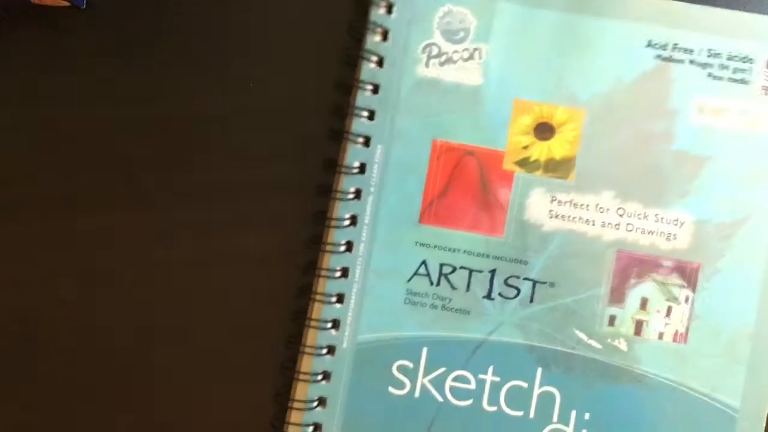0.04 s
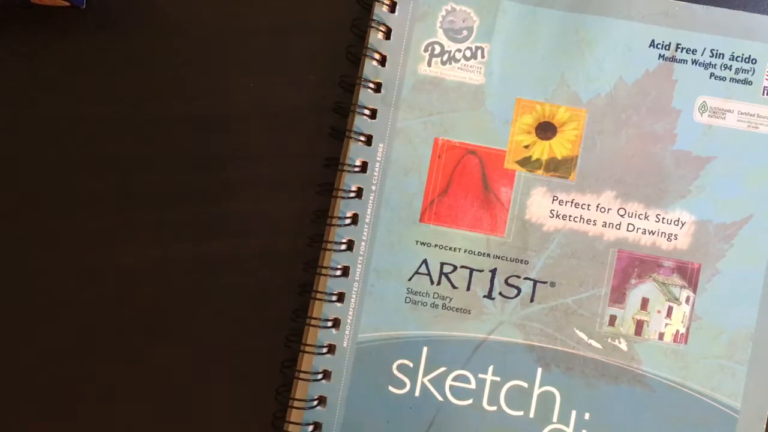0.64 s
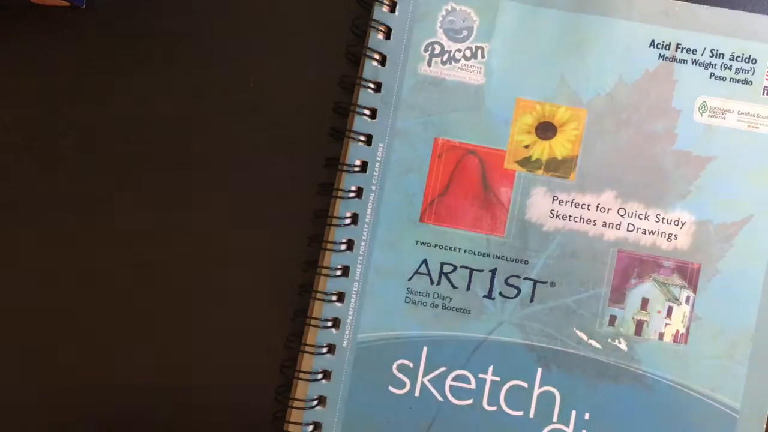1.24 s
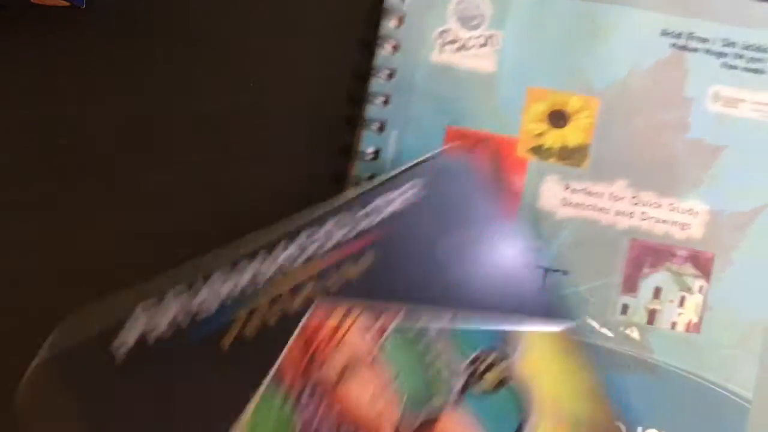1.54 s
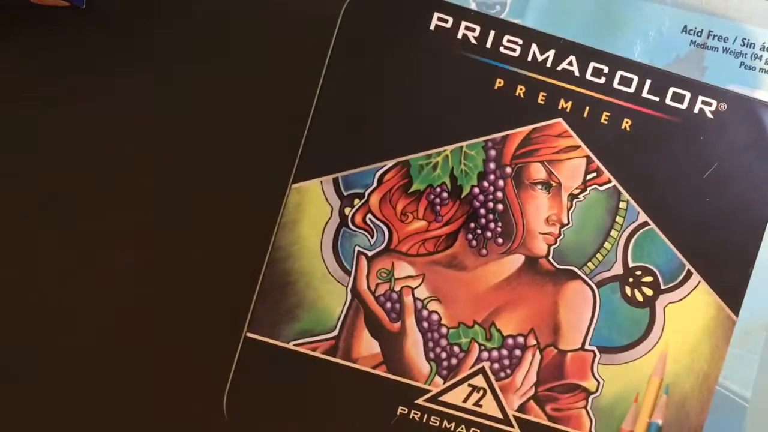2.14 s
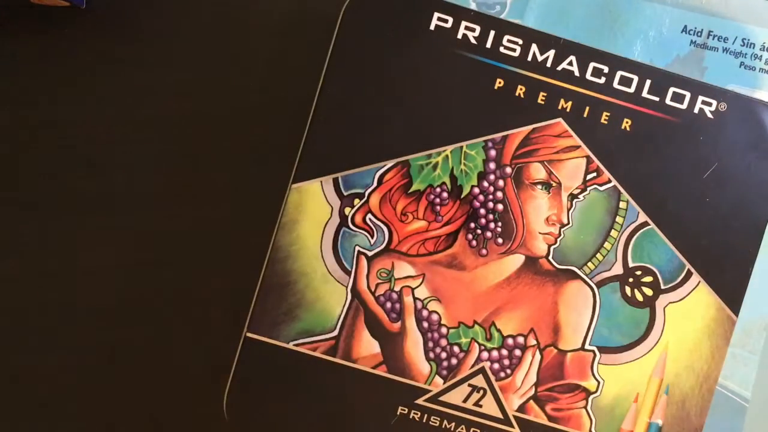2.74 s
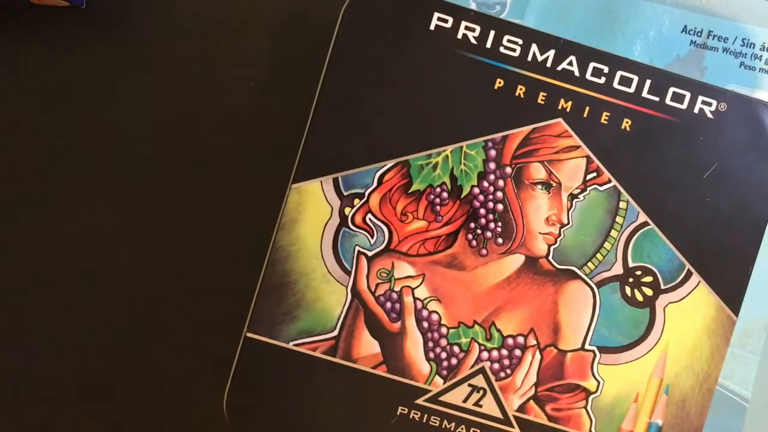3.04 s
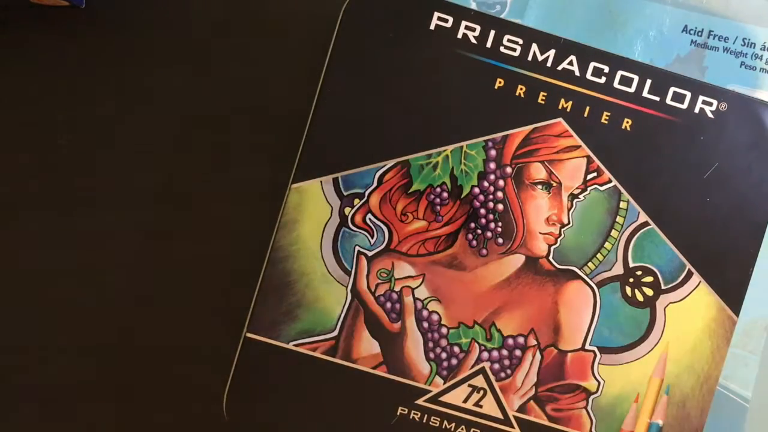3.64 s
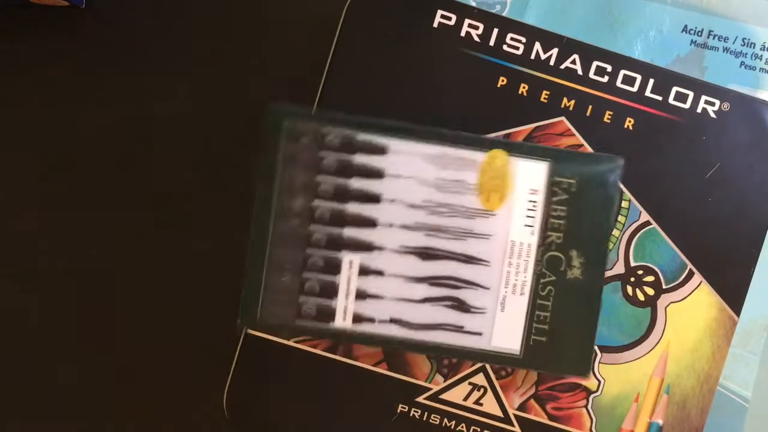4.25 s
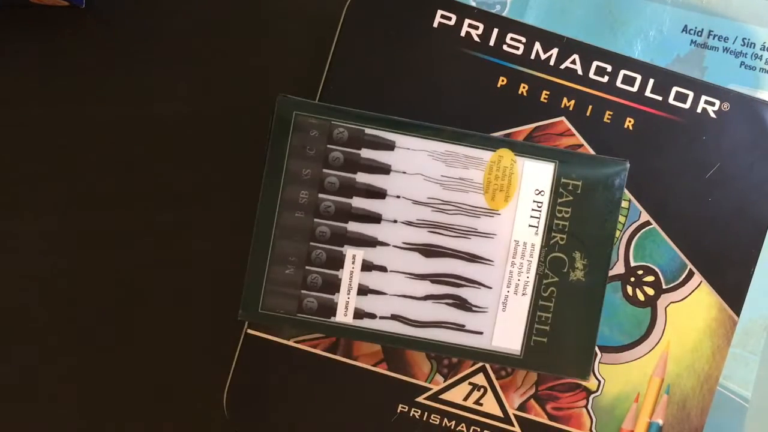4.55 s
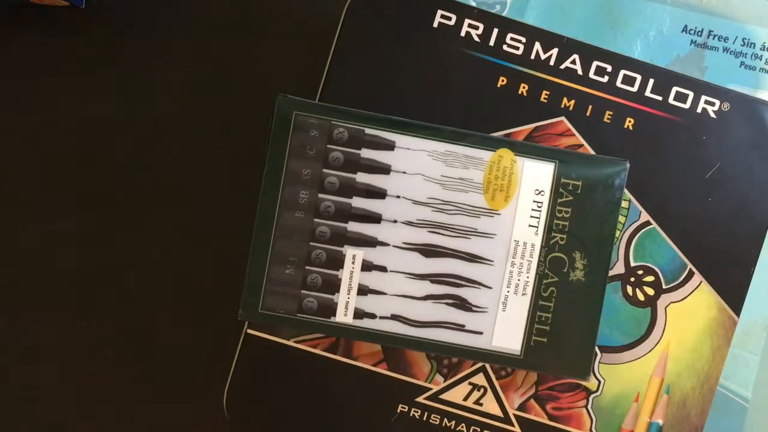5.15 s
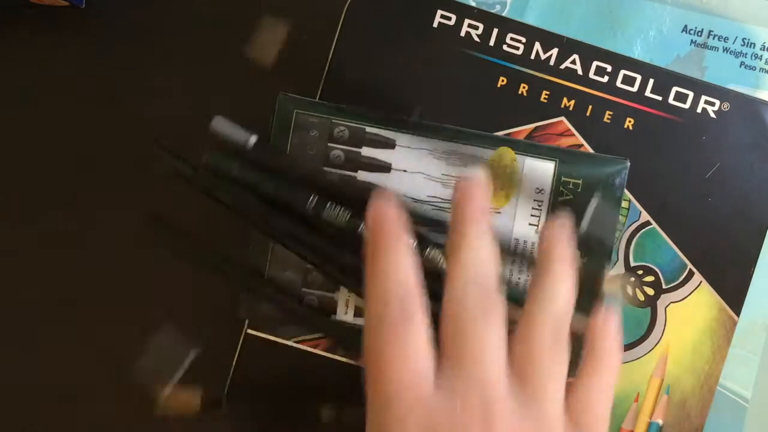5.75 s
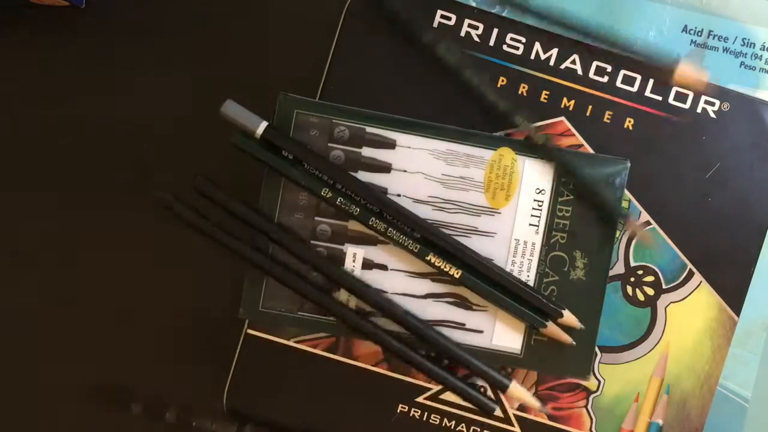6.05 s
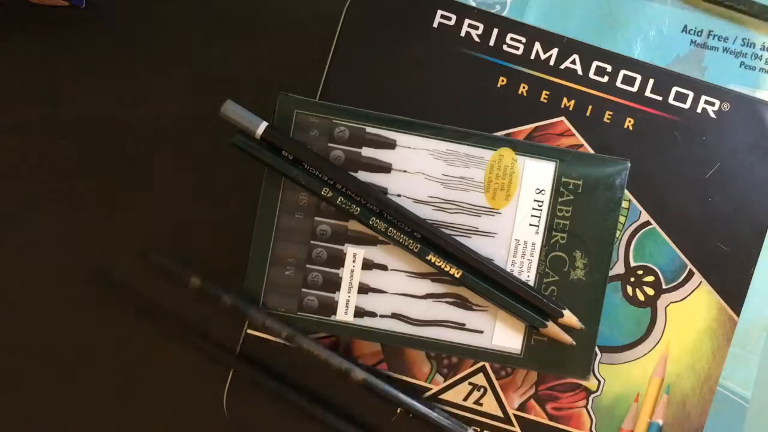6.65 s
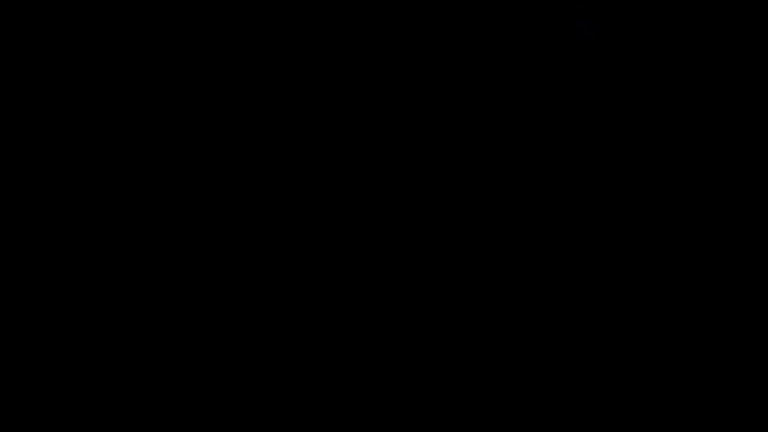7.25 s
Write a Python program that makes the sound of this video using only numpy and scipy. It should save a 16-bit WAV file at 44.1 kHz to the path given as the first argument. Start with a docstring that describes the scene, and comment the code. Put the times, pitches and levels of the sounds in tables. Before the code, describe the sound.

A tin and a plastic pen pack knock down on a table, then loose wooden pencils spill and clatter over the pile.

```python
"""Art supplies piled on a table

Close to a phone in a small quiet room, fingers shift the phone and brush packaging. A flat tin of pencils lands
on a sketchbook in three knocks and a plastic pack of pens drops on it. Loose pencils click in a hand, spill on
the pile in two bursts, bounce and roll off. Each blow is a noise crack (dense modes) plus a short ring
(distinct modes); the walls add a brief tail."""
import sys
import numpy as np
from scipy import signal
from scipy.fft import rfft, irfft, next_fast_len
from scipy.io import wavfile

SR = 44100
rng = np.random.default_rng(int(sys.argv[2]) if len(sys.argv) > 2 else 0)


def master(y):
    """Save y as 16-bit WAV."""
    cut = np.clip(np.atleast_2d(y).T, -1, 1)
    pcm = np.round(cut * 32767)  # scale
    wavfile.write(sys.argv[1], SR, pcm.astype(np.int16))


N = 325581
BLOW_SAMPLES = 12288
AGE_S = np.arange(BLOW_SAMPLES) / SR

# Noise spectra of room, fingers and struck things: f/Hz, relative density/dB
AIR_SPECTRUM = [(12, -37), (20, -5.5), (120, -5), (177, -17.5), (262, -17.5), (319, -27), (347, -26.5),
                (560, -31.5), (698, -39), (897, -33.5), (3950, -43.5), (4940, -46), (6010, -45.5),
                (16000, -54.5)]
BRUSH_SPECTRUM = [(100, -6.5), (400, -10), (700, -9.5), (1200, -3), (2200, -7.5), (4000, -11), (8000, -18),
                  (15000, -25)]
CLICK_SPECTRUM = [(200, -29), (700, -29), (1300, -8), (2800, -1.5), (6000, 8), (9000, 4), (14000, -10)]
PACK_SPECTRUM = [(50, -27.5), (110, -12), (220, -4.5), (400, -0.5), (600, -14.5), (1200, 1.5), (2000, -6.5),
                 (2800, -6.5), (4000, -9.5), (6000, -14.5), (9000, -11.5), (14000, -25)]
TIN_SPECTRUM = [(40, -19), (70, 3), (105, -7), (170, 0), (400, 2.5), (750, -3.5), (1200, -3), (2000, -7),
                (3500, -11), (6000, -16), (9000, -17), (14000, -21)]
PENCIL_SPECTRUM = [(50, -49), (130, -8.5), (260, -1.5), (450, 0), (750, -4.5), (1200, -3), (2200, -0.5),
                   (3500, -7), (6000, -8), (9000, -15), (14000, -24.5)]
# Mains hum: f/Hz, rms level/dB
HUM_PARTIALS = [(59.2, -61), (118.4, -59)]
# Phone port notches: f/Hz, width/Hz, gain/dB
PORT_NOTCHES = [(4970, 170, -2.5), (7475, 700, -2), (10170, 690, -5)]
# Resonances: f/Hz, relative level/dB, t60/s
HELD_STICK_MODES = [(2300, -9, .025), (2950, -8, .03), (3390, -6, .03), (4340, -7, .03), (5540, 2, .045),
                    (6500, -3, .035), (7000, -1, .035), (8150, -5, .04), (9220, -2, .035),
                    (12420, -10, .035)]
FREE_STICK_MODES = [(2140, 8, 0.03), (2560, -8, 0.07), (2920, 2.5, 0.032), (3550, 8, 0.04), (4080, 1, 0.05),
                    (5280, 6, 0.048), (5650, -12, .08), (5915, -8, 0.06), (6550, -6, 0.05),
                    (6210, -3, 0.031), (8190, 0.5, 0.045), (9000, -6, 0.055), (9500, -4, 0.035),
                    (11300, -8, 0.045), (12450, -7, .04), (14600, -14, .04)]
PILE_MODES = [(123, -16, 0.12), (170, -5, .12), (241.6, -0.5, .11), (350, -7, 0.07), (446, -0.5, 0.075),
              (664, -14, 0.11), (805, -7, 0.11), (1045, -2.5, 0.1), (1141, -2, 0.13), (1270, -2, .07),
              (1420, -5, .07), (1730, -1.5, 0.1), (1790, -6, .09), (2253, -11.5, 0.1)]
LID_MODES = [(61.8, -17, .14), (155, -13, .1), (185, -14.5, 0.073), (319, -3, 0.12), (421, 3, .09),
             (525, -13, .08), (655, -8.5, 0.086), (820, -7, .09), (930, -4.5, .085), (1052, -6.5, .09),
             (1220, -14, .09), (1315, -3.5, .1), (1765, -14, .12)]
# Finger strokes, first on the phone itself, then on packaging: t/s, level/dB, length/s, thud/dB, tilt/(dB/oct)
BRUSH_STROKES = [(.002, -42, .024, 4, 2.5), (.016, -62, .15, 4, 4), (.5, -63, .14, 12, -1),
                 (.684, -57, .037, 21, 2), (.616, -63, .3, 4, 5), (.856, -46, .059, 3, -4),
                 (.947, -56, .021, 14, -1), (1.504, -52.5, .097, 10, -5), (3.03, -59, .03, -6, -8),
                 (3.119, -53.5, .05, -12, -5), (3.553, -60.5, .08, -8, -2), (3.642, -51.5, .083, -15, -4),
                 (3.94, -49, .033, -9, -4), (3.997, -47, .045, -6, -1)]
# Clicks in the hand: t/s, level/dB, tilt/(dB/oct), f/Hz
HAND_CLICKS = [(.273, -44, -9, 2370), (.372, -31.5, -6, 2570), (.403, -46, -9, 2490),
               (2.627, -51, -17, 2800), (4.46, -51, -14, 3060), (4.635, -53, -7, 3470),
               (4.693, -52, -5, 3500), (4.741, -45, -7, 2850), (4.747, -36, 1, 5390), (4.77, -36, 3, 3340),
               (4.802, -24, 1, 5500), (4.831, -32, 0, 5650), (4.864, -36, -11, 3400),
               (4.889, -40, -6, 5600), (4.897, -40, -9, 3350), (4.949, -38.5, -3, 3010),
               (5.022, -51, -10, 3300), (5.465, -46, -13, 3550), (5.611, -44, -13, 2900),
               (5.664, -46, -13, 2960)]
# Pen pack landing: t/s, level/dB, thud/dB, tilt/(dB/oct)
PACK_BLOWS = [(4.141, -27, 6, 0), (4.147, -17.5, -1, -1), (4.158, -19.5, 3.5, 1), (4.163, -14.5, 2, -1),
              (4.169, -25, 7, -2), (4.269, -40, -11, -4), (4.306, -44, -10, -7)]
# Tin landing and rocking to rest: t/s, level/dB, thud/dB, tilt/(dB/oct), lid ring/dB, rim lead/s
TIN_KNOCKS = [(1.594, -14.5, 0, 2.5, -10, .011), (1.69, -14, 1, -4, 0, .021),
              (1.817, -20, -2, 1.5, 0, .017), (1.846, -29, -4, -2, -9, .005),
              (1.886, -28.5, -3, 0, -6, .007), (1.937, -39, -4, 2, 3, .004), (1.977, -43, -2, -4, -5, .003),
              (2.034, -56, 5, 4, -8, .001)]
# Pencils hitting the pile: t/s, level/dB, thud/dB, tilt/(dB/oct), stick ring/dB, clack f/Hz
PENCIL_BLOWS = [(5.719, -19, 4, 3, -2, 1730), (5.75, -12, -20, -4, -1, 1220),
                (5.758, -21.5, -16, 10, -5, 2000), (5.766, -19.5, -7, 5, -9, 1170),
                (5.808, -20.5, -1, -2, -1, 1330), (5.829, -22, -14, -5, 3, 1180),
                (5.843, -26, -7, 3, -7, 940), (5.856, -26, -9, -7, -2, 1420), (5.917, -26, 7, 0, 3, 1720),
                (5.935, -28, 3, 1, -6, 1730), (5.968, -25, 2, 9, -15, 1900), (5.993, -32, 6, 9, 6, 1940),
                (6.011, -29, -4, -3, 7, 1080), (6.053, -27, 7, 8.5, -4, 780),
                (6.066, -22.5, 4, 4, -8, 1730), (6.098, -28, 8, 0, 8, 1980), (6.125, -30, -9, 0, 9, 1730),
                (6.145, -23, -7, -1, 6, 1740), (6.156, -26, 2, -7, 4, 1920), (6.174, -27, 4, 6, -1, 1730),
                (6.212, -33, 5, 0, -15, 1020), (6.284, -30.5, 0, 0, -2, 2000),
                (6.345, -16.5, -6, -21, 2, 810), (6.37, -20.5, -8, -8, -3, 790),
                (6.424, -23, -3, -6, -4, 1610), (6.474, -23.5, -3, 2, 1, 1820),
                (6.488, -27.5, 8, 6, 9, 1960), (6.543, -27.5, 0, 8, -20, 1220),
                (6.615, -28, 1, 6, -15, 1780), (6.682, -22.5, -3, -5, 3, 1070),
                (6.743, -36, 11, 3, -15, 1080), (6.775, -31.5, 9, 4, -9, 1220),
                (6.823, -25.5, -2, -3, -6, 1740), (6.864, -35, 5, 1, -3, 630),
                (6.931, -45, 6, -7, -12, 1200), (7.019, -48, 8, 7, 0, 1400), (7.03, -24, 4.5, -2, -4, 1430),
                (7.062, -12.5, -10, -14, -2, 1230), (7.117, -37, 8, 3, 1, 1170),
                (7.166, -24.5, 3.5, -3, -1, 2000), (7.186, -29, -9, -2, -7, 1170),
                (7.214, -28.5, 0, -5, -10, 1620), (7.228, -27, -9, -6, 12, 1620),
                (7.245, -30, -5, -8, 12, 1990), (7.28, -32, 2, -8, 10, 1900),
                (7.293, -30, -3, -2, -8, 1730), (7.31, -34, -4, -3, 3, 1600), (7.355, -36, 0, 1, -5, 1890),
                (7.372, -33.5, -8, -3, 4, 1700)]
# Runs of ticks: t/s, length/s, level/dB, fade/(dB/s), tilt/(dB/oct)
PEN_RATTLE = (4.18, .14, -44.5, 60, 1)
HANDFUL = (4.807, .1, -30, 130, -5)
FIRST_SPILL = (5.77, .92, -28, 8, -3)
LAST_SPILL = (7.19, .19, -34, 25, -4)


def undb(db):
    """Decibels to gain."""
    return 10 ** (np.asarray(db) / 20)


def curve(points, hz):
    """Gain from (f/Hz, level/dB) points, interpolated in log frequency."""
    point_hz, db = np.transpose(points)
    return undb(np.interp(np.log(hz + 1), np.log(point_hz), db))


def shaped(x, gain):
    """Minimum-phase filter of magnitude gain(hz); attacks stay sharp."""
    n = next_fast_len(len(x) + BLOW_SAMPLES, real=True) // 2 * 2
    hz = np.arange(n // 2 + 1) * SR / n
    cepstrum = irfft(np.log(gain(hz) + 1e-9))
    cepstrum[1:n // 2] *= 2
    cepstrum[n // 2 + 1:] = 0
    return irfft(rfft(x, n) * np.exp(rfft(cepstrum)))[:len(x)]


def unit(x):
    """Scale to the energy of 10 ms at rms 1."""
    return x * np.sqrt(SR / 100 / np.sum(x ** 2, axis=-1, keepdims=True))


def add(track, t_s, x):
    """Mix x into the track at t_s."""
    i = int(t_s * SR)
    track[i:i + len(x)] += x[:max(N - i, 0)]


def noise_bands():
    """Half-octave noise strips: (centres/Hz, strips)."""
    centres_hz = 44 * 2 ** (np.arange(18) / 2)
    hz = np.arange(4 * BLOW_SAMPLES + 1) * SR / (8 * BLOW_SAMPLES)
    bands_apart = np.abs(2 * np.log2((hz + 1) / centres_hz[:, None]))
    masks = np.cos(np.pi / 2 * np.minimum(bands_apart, 1))
    return centres_hz, irfft(masks * np.exp(2j * np.pi * rng.random(masks.shape)))


def crack(bands, spectrum, t60_s, damping, rise_s, scatter_db):
    """Dense modes as a noise burst; times hold at 1 kHz and shorten towards the treble."""
    hz, strips = bands
    start = rng.integers(strips.shape[1] - BLOW_SAMPLES)
    time_scale = (np.maximum(hz, 250)[:, None] / 1000) ** -damping
    attack = 1 - np.exp(-AGE_S / (rise_s * time_scale))
    decay = undb(-60 * AGE_S / (t60_s * time_scale))
    bursts = strips[:, start:start + BLOW_SAMPLES] * attack * decay
    spot_gain = undb(scatter_db * rng.uniform(-1, 1, len(hz)))
    return unit((curve(spectrum, hz) * np.sqrt(hz) * spot_gain) @ unit(bursts))


def ring(modes, detune, scatter_db):
    """Distinct damped modes; a random contact point sets each one's strength and sign."""
    hz, db, t60_s = np.transpose(modes)
    pitch, size, side = rng.uniform(-1, 1, (3, len(hz)))
    detuned_hz = hz * (1 + detune * pitch)
    waves = np.sin(2 * np.pi * detuned_hz[:, None] * AGE_S) * undb(-60 * AGE_S / t60_s[:, None])
    return unit((np.sign(side) * undb(db + scatter_db * size)) @ waves)


def contact(x, thud_db, tilt_db_oct):
    """A heavy contact lifts the bass; a hard one tilts the treble up, a soft one down."""
    def gain(hz):
        treble_oct = np.log2(np.hypot(1, hz / 3600))
        return curve([(380, thud_db), (850, 0)], hz) * undb(tilt_db_oct * treble_oct)
    return shaped(x, gain)


def chatter(x, spread_s, gain, count):
    """A loose contact touches again softly within spread_s."""
    out = x.copy()
    for late, strength in rng.uniform(-.9, 1, (count, 2)):
        lag = 1 + int(abs(late) * spread_s * SR)
        out[lag:] += gain * strength * x[:-lag]
    return unit(out)


def room_tone():
    """House rumble, faint hiss and mains hum."""
    noise = rng.standard_normal(N + BLOW_SAMPLES)
    air = shaped(noise, lambda hz: curve(AIR_SPECTRUM, hz))[BLOW_SAMPLES:]
    hum = sum(undb(db) * np.sqrt(2) * np.sin(2 * np.pi * (hz * np.arange(N) / SR + rng.random()))
              for hz, db in HUM_PARTIALS)
    return undb(-53) * air / air.std() + hum


def walls(x, bands, t60_s, treble_t60_s, wet_db, treble_db, onset_s):
    """Near walls add a short diffuse tail, duller than the direct sound."""
    hz, strips = bands
    age_s = np.arange(2 * BLOW_SAMPLES) / SR
    band_t60_s = np.interp(np.log(hz), np.log([2500, 13000]), [t60_s, treble_t60_s])
    onset = 1 - np.exp(-(age_s / onset_s) ** 2)
    tails = unit(strips[:, :len(age_s)] * undb(-60 * age_s / band_t60_s[:, None]) * onset)
    band_share = np.sqrt(hz / hz.sum() * 100 / SR)
    response = (band_share * curve([(100, -2), (2000, -1.5), (10000, treble_db)], hz)) @ tails
    return x + undb(wet_db) * signal.fftconvolve(x, response)[:N]


def finger_brushes():
    """Fingers slide over the phone and packaging in swells of tiny uneven slips."""
    out = np.zeros(N)
    for t_s, db, length_s, thud_db, tilt_db_oct in BRUSH_STROKES:
        swell = np.sin(np.pi * np.minimum(AGE_S / length_s, 1) ** 1.1)
        grip_db = 7 * np.interp(AGE_S, np.linspace(0, AGE_S[-1], 96), rng.uniform(-1, 1, 96))
        slips = rng.standard_normal(BLOW_SAMPLES) * undb(grip_db)
        rub = shaped(slips, lambda hz: curve(BRUSH_SPECTRUM, hz))
        add(out, t_s, undb(db) * contact(rub / rub.std() * swell, thud_db, tilt_db_oct))
    return out


def hand_clicks(bands):
    """Held pens and pencils knock together: thin damped clicks, each with its own pitch."""
    out = np.zeros(N)
    for t_s, db, tilt_db_oct, hz in HAND_CLICKS:
        click = crack(bands, CLICK_SPECTRUM, t60_s=.036, damping=.25, rise_s=.00069, scatter_db=4)
        sticks = undb(-8) * ring(HELD_STICK_MODES, detune=.03, scatter_db=4)
        note = undb(-8) * ring([(hz, 0, .024), (2.3 * hz, -5, .024)], detune=.015, scatter_db=1)
        touch = chatter(click + sticks + note, spread_s=.009, gain=.25, count=2)
        add(out, t_s, undb(db) * contact(touch, 0, tilt_db_oct))
    return out


def rolling(bands, middle_s, half_length_s, peak_db, swell_db, count):
    """Flats of rolling pencils drum on the table: a dull patter that swells and fades."""
    out = np.zeros(N)
    for k, (late, weakness) in enumerate(rng.random((count, 2))):
        along = 2 * (k + late) / count - 1
        tick = crack(bands, PENCIL_SPECTRUM, t60_s=.03, damping=.45, rise_s=.0015, scatter_db=6.5)
        dull_tick = contact(tick, thud_db=3, tilt_db_oct=-36)
        db = peak_db - swell_db * along ** 2 - 8 * weakness
        add(out, middle_s + half_length_s * along, undb(db) * dull_tick)
    return out


def jostle(bands, run, spectrum, modes, ring_db, count):
    """Jostling sticks tick unevenly, fading and dulling as they settle."""
    out = np.zeros(N)
    start_s, length_s, db, fade_db_per_s, tilt_db_oct = run
    for k, (late, weakness) in enumerate(rng.random((count, 2))):
        age_s = length_s * (k + late) / count
        tick = crack(bands, spectrum, t60_s=.028, damping=.5, rise_s=.0009, scatter_db=6.5)
        tone = undb(ring_db) * ring(modes, detune=.025, scatter_db=10)
        touch = contact(tick + tone, 0, tilt_db_oct - 7 * age_s)
        add(out, start_s + age_s, undb(db - fade_db_per_s * age_s - 11 * weakness) * touch)
    return out


def pen_pack(bands):
    """The plastic pack slaps the tin; the whole pile booms."""
    out = np.zeros(N)
    for t_s, db, thud_db, tilt_db_oct in PACK_BLOWS:
        slap = crack(bands, PACK_SPECTRUM, t60_s=.045, damping=.12, rise_s=.00061, scatter_db=.5)
        pile = undb(-4.5) * ring(PILE_MODES, detune=.0085, scatter_db=1)
        add(out, t_s, undb(db) * contact(slap + pile, thud_db, tilt_db_oct))
    return out


def tin_blow(bands, thud_db, tilt_db_oct, lid_db):
    """One tin contact: a crack and the boom of the lid."""
    knock = crack(bands, TIN_SPECTRUM, t60_s=.057, damping=.12, rise_s=.0022, scatter_db=2.5)
    lid = undb(lid_db) * ring(LID_MODES, detune=.012, scatter_db=3)
    return contact(knock + lid, thud_db, tilt_db_oct)


def tin(bands, load_lag_s):
    """Per knock: the rim touches twice, the tin lands flat, the pencils inside thump twice."""
    out = np.zeros(N)
    for t_s, db, thud_db, tilt_db_oct, lid_db, lead_s in TIN_KNOCKS:
        for early_s, rim_db in [(lead_s, -15.5), (lead_s / 2, -9.5)]:
            rim = tin_blow(bands, thud_db, tilt_db_oct=3.5, lid_db=-13)
            add(out, t_s - early_s, undb(db + rim_db) * rim)
        add(out, t_s, undb(db) * tin_blow(bands, thud_db, tilt_db_oct, lid_db))
        for k, late in enumerate(rng.uniform(-.15, .15, 2), start=1):
            thump = tin_blow(bands, thud_db, tilt_db_oct - 5, lid_db)
            add(out, t_s + load_lag_s * (k + late), undb(db - 4 * k) * thump)
    return out


def pencil_blow(bands, ring_db, clack_hz):
    """A wooden stick ticks, drums on the pile and rings in its bending modes."""
    tick = crack(bands, PENCIL_SPECTRUM, t60_s=.034, damping=.35, rise_s=.0013, scatter_db=3)
    pile = undb(-10) * ring(PILE_MODES, detune=.0386, scatter_db=.5)
    pitch_ratio = 1 + .012 * rng.uniform(-1, 1)  # stick lengths differ
    own_modes = np.array(FREE_STICK_MODES) * [pitch_ratio, 1, 1]
    stick = undb(ring_db - 3.5) * ring(own_modes, detune=.018, scatter_db=12)
    low_modes = [(clack_hz, 0, .063), (2.3 * clack_hz, -3, .052)]  # set by where the stick is propped
    clack = undb(-8) * ring(low_modes, detune=.02, scatter_db=.5)
    return chatter(tick + pile + stick + clack, spread_s=.014, gain=.32, count=3)


def pencils(bands, bounce_s, bounce_db):
    """Each pencil lands on one end, then softer and duller on the other."""
    out = np.zeros(N)
    for t_s, db, thud_db, tilt_db_oct, ring_db, clack_hz in PENCIL_BLOWS:
        landing = contact(pencil_blow(bands, ring_db, clack_hz), thud_db, tilt_db_oct)
        add(out, t_s, undb(db) * landing)
        bounce = contact(pencil_blow(bands, ring_db, clack_hz), thud_db, tilt_db_oct - 3)
        add(out, t_s + bounce_s * rng.uniform(.7, 1.3), undb(db + bounce_db) * bounce)
    return out


def scene():
    """Everything on the table, heard in the room."""
    bands = noise_bands()
    table = tin(bands, load_lag_s=.0095) + pen_pack(bands)
    table += pencils(bands, bounce_s=.014, bounce_db=-12.5)
    table += jostle(bands, PEN_RATTLE, PACK_SPECTRUM, PILE_MODES, ring_db=-12, count=16)
    table += jostle(bands, HANDFUL, CLICK_SPECTRUM, HELD_STICK_MODES, ring_db=-6, count=12)
    table += jostle(bands, FIRST_SPILL, PENCIL_SPECTRUM, FREE_STICK_MODES, ring_db=-6, count=76)
    table += jostle(bands, LAST_SPILL, PENCIL_SPECTRUM, FREE_STICK_MODES, ring_db=-3, count=15)
    table += rolling(bands, middle_s=6.765, half_length_s=.19, peak_db=-29, swell_db=15, count=48)
    table += hand_clicks(bands) + finger_brushes()
    room = walls(table, bands, t60_s=.25, treble_t60_s=.13, wet_db=-10.5, treble_db=-2.5, onset_s=.007)
    return (room + room_tone())[None]


def record(dry):
    """Phone: the port notches the treble and sheds deep bass; peaks are rounded, the top is cut."""
    def port_gain(hz):
        return undb(sum(db * np.exp(-((hz - centre_hz) / width_hz) ** 2)
                        for centre_hz, width_hz, db in PORT_NOTCHES))
    low_hz, top_hz, ceiling = 37, 15750, .5
    highpass = signal.butter(4, low_hz, "high", fs=SR, output="sos")
    lowpass = signal.ellip(10, .2, 80, top_hz, fs=SR, output="sos")
    port = signal.sosfilt(highpass, shaped(dry[0], port_gain))
    rounded = ceiling * np.tanh(port / ceiling)
    return signal.sosfilt(lowpass, rounded)[None]


dry = scene()
out = record(dry)
master(out)
```